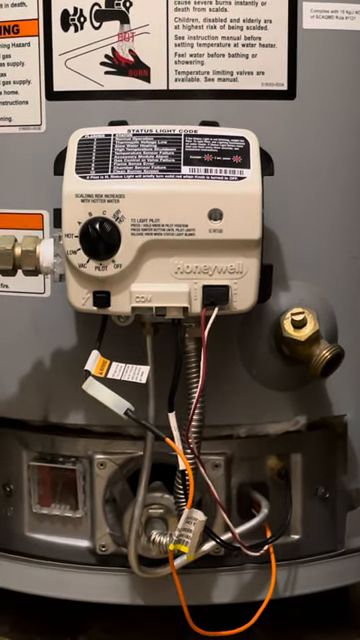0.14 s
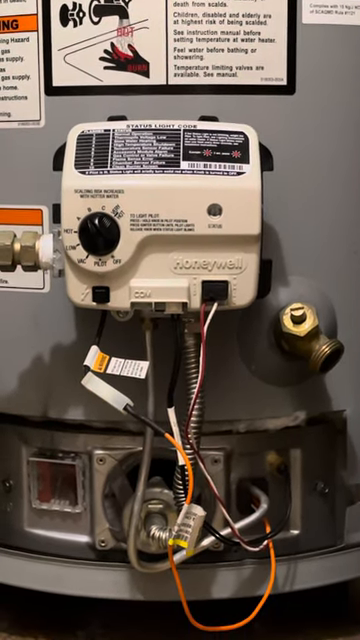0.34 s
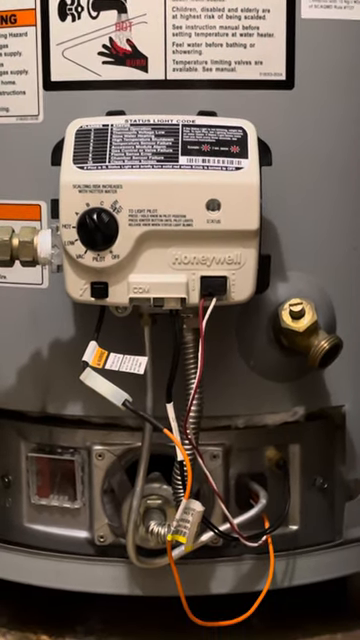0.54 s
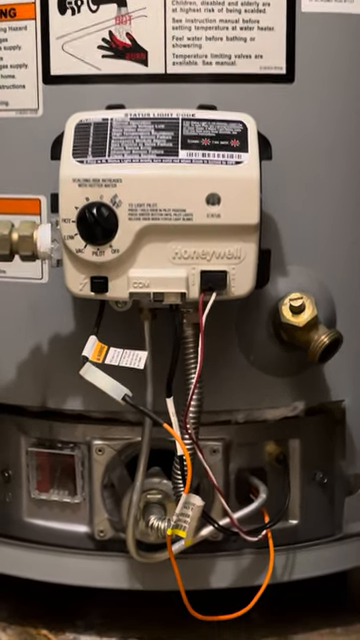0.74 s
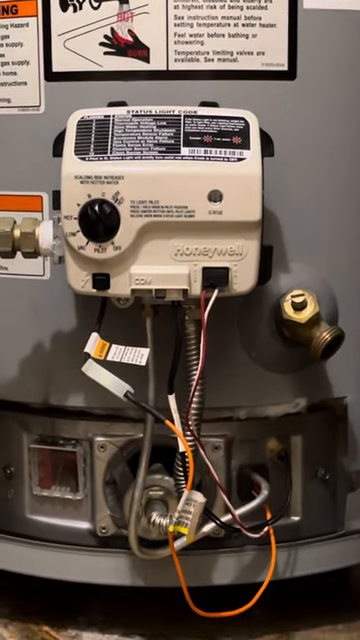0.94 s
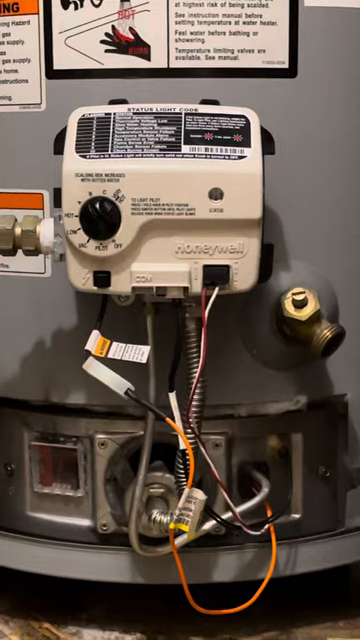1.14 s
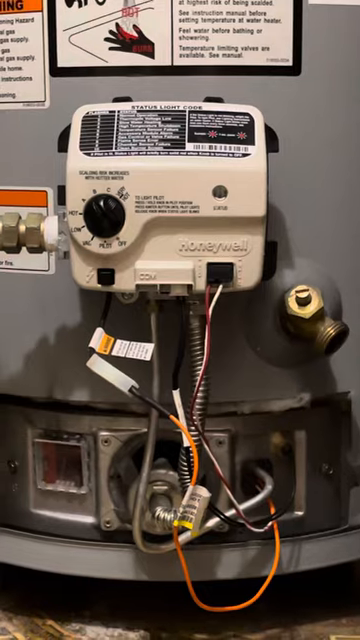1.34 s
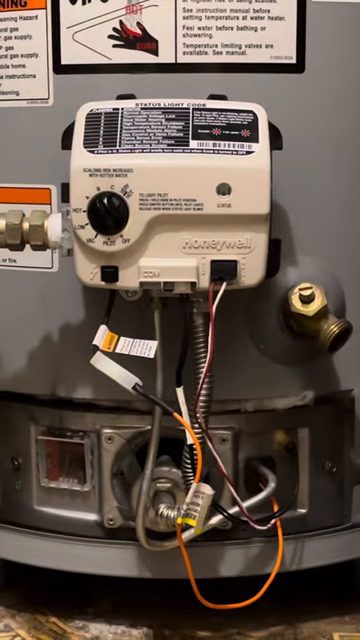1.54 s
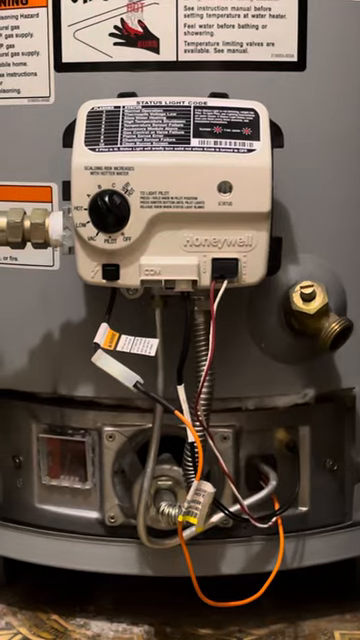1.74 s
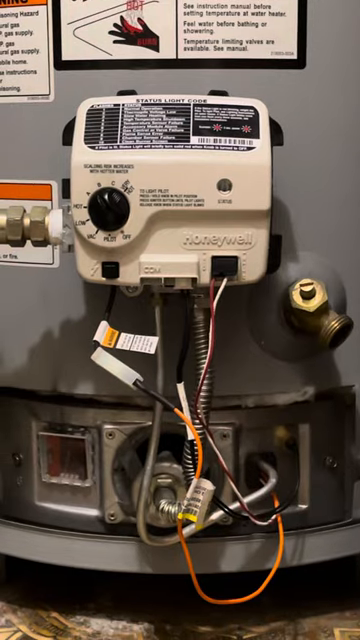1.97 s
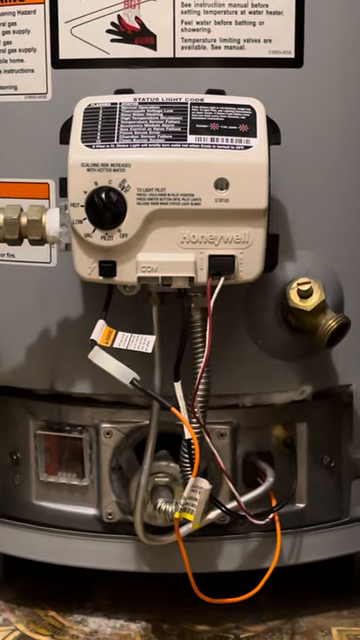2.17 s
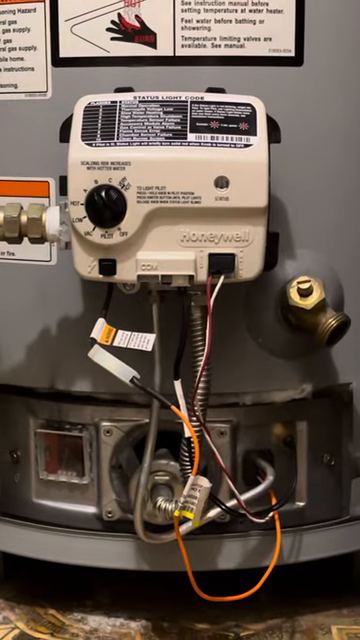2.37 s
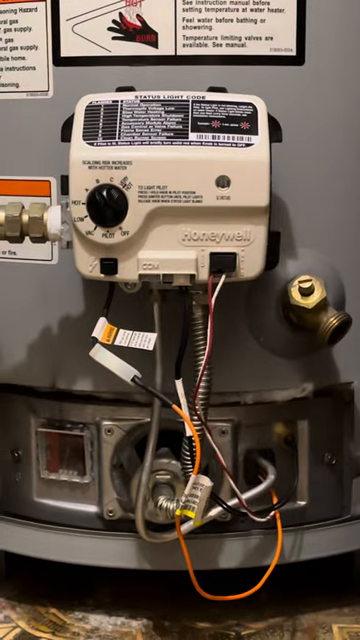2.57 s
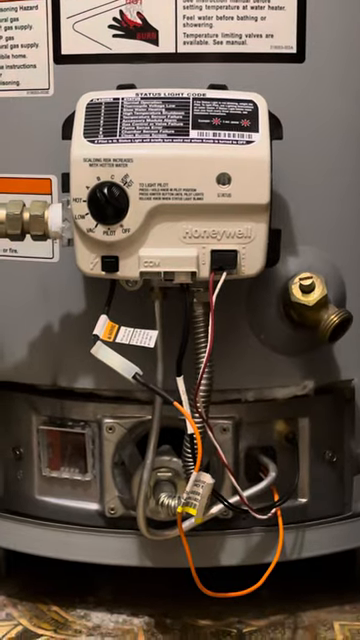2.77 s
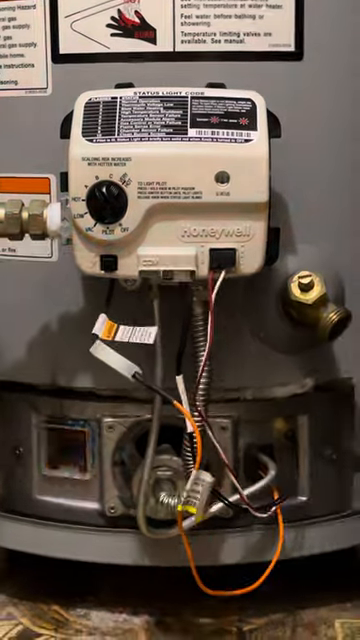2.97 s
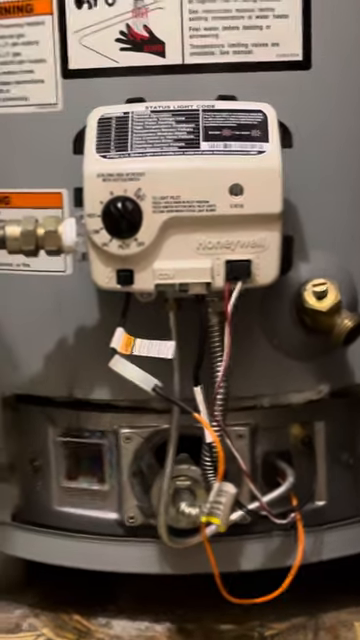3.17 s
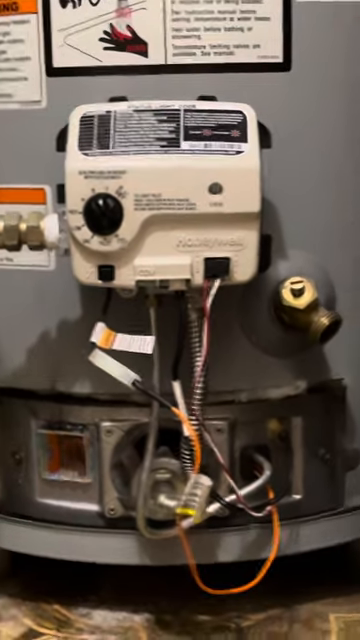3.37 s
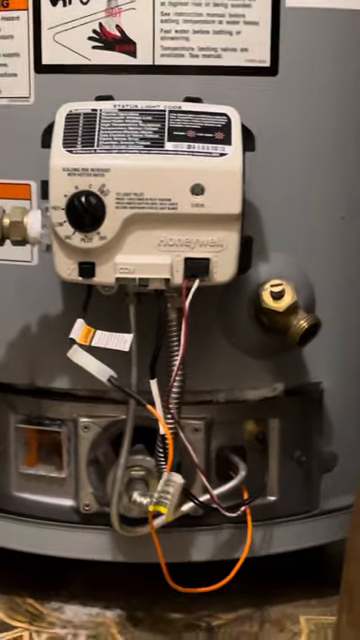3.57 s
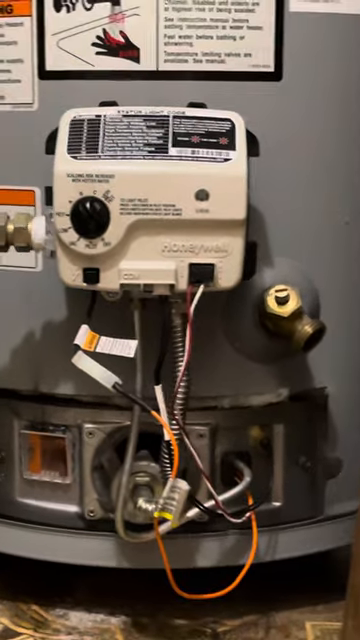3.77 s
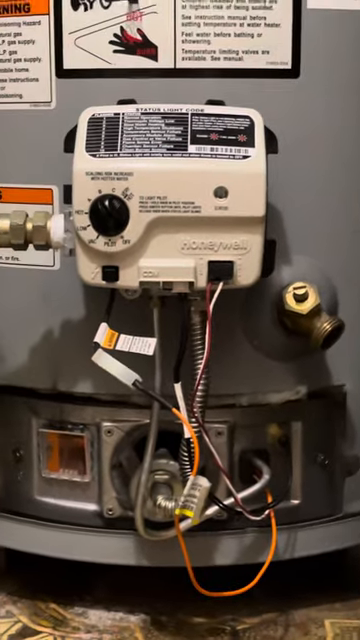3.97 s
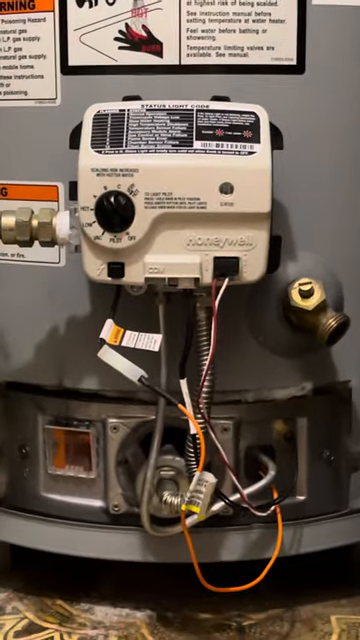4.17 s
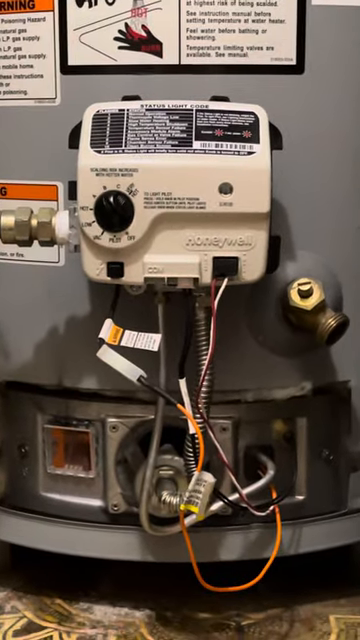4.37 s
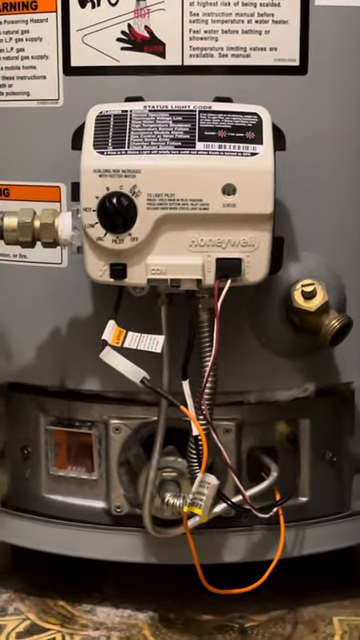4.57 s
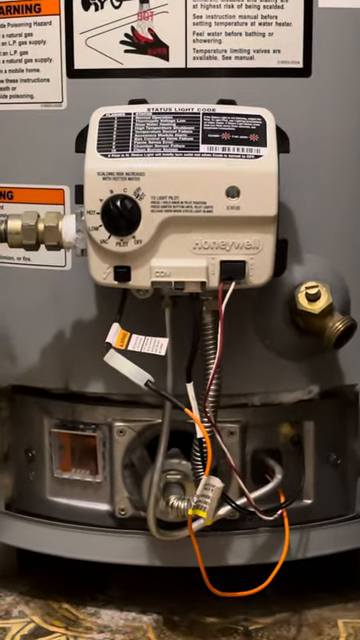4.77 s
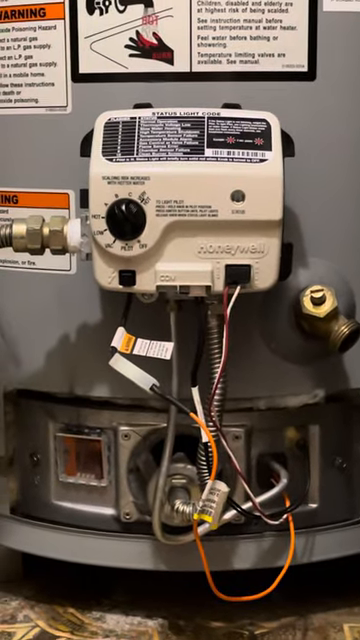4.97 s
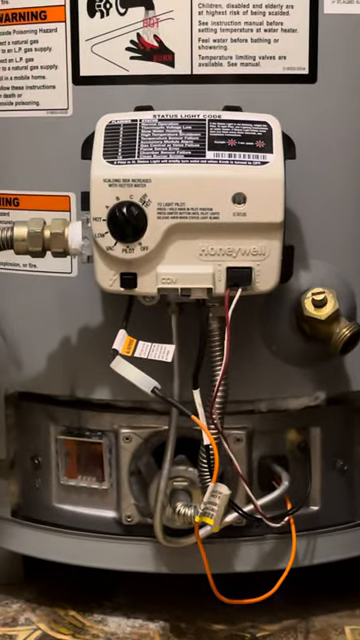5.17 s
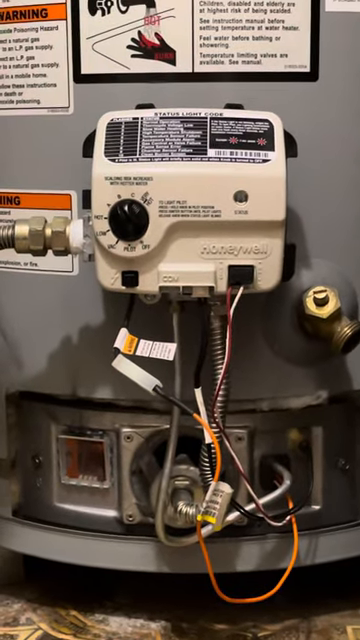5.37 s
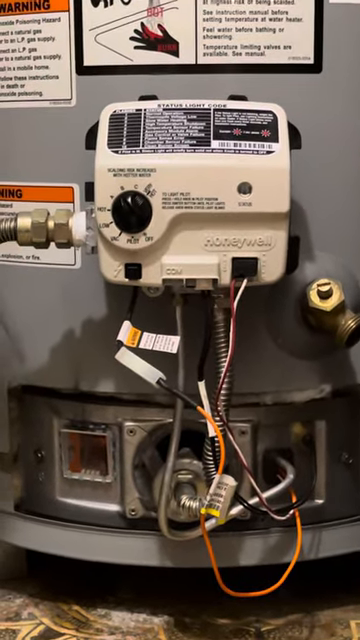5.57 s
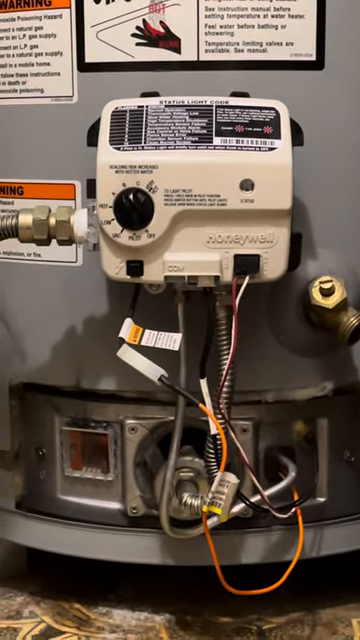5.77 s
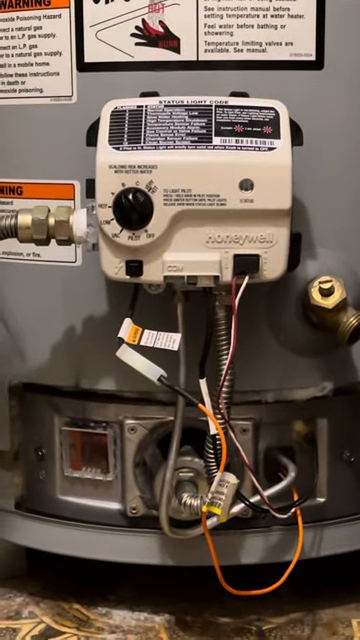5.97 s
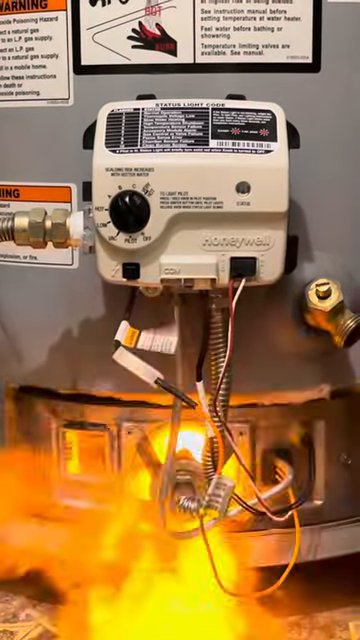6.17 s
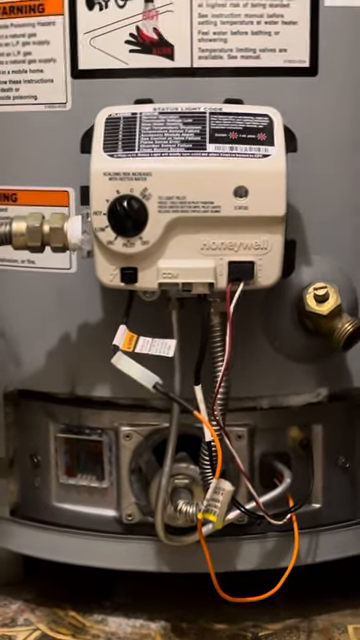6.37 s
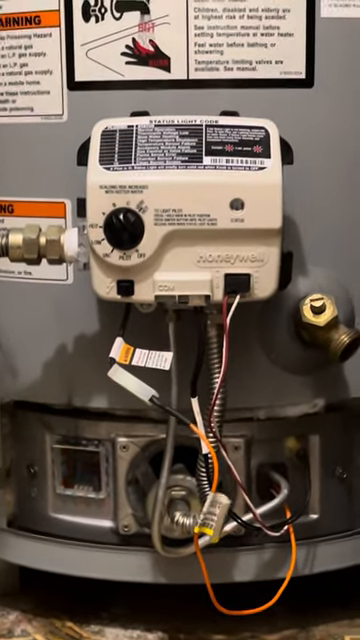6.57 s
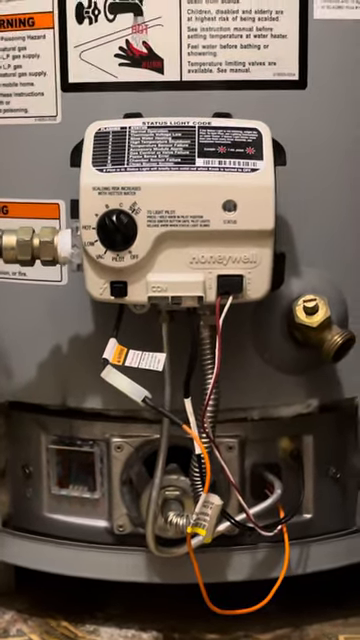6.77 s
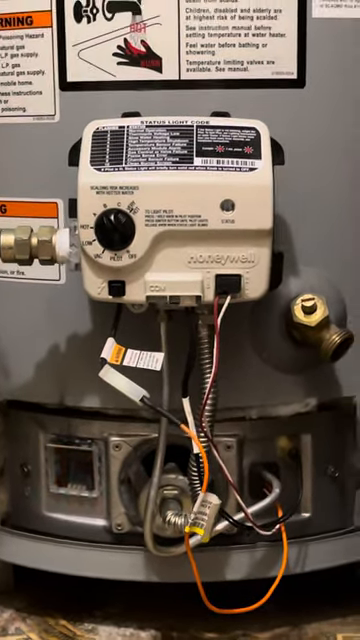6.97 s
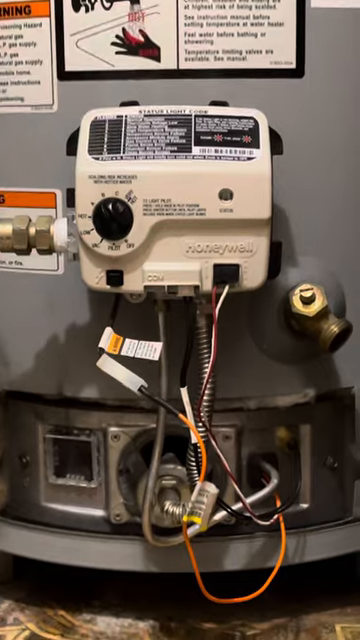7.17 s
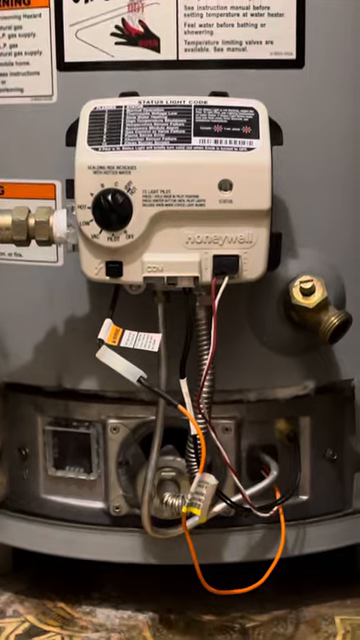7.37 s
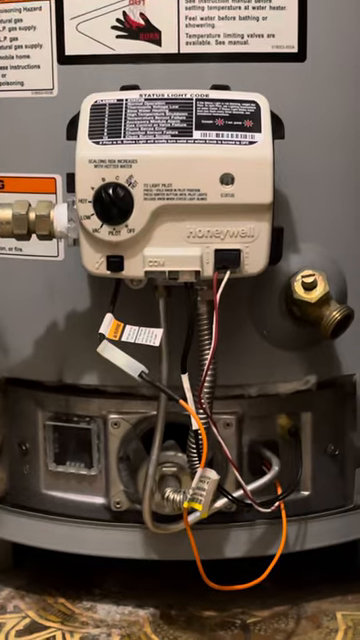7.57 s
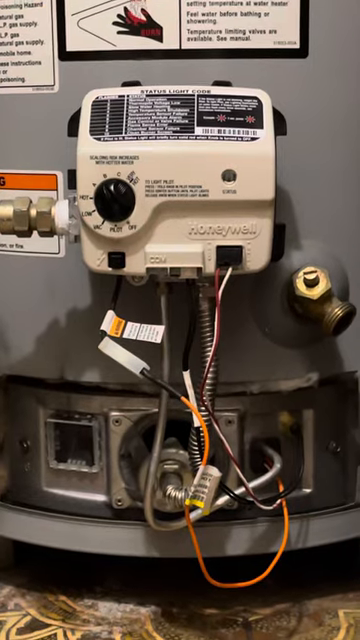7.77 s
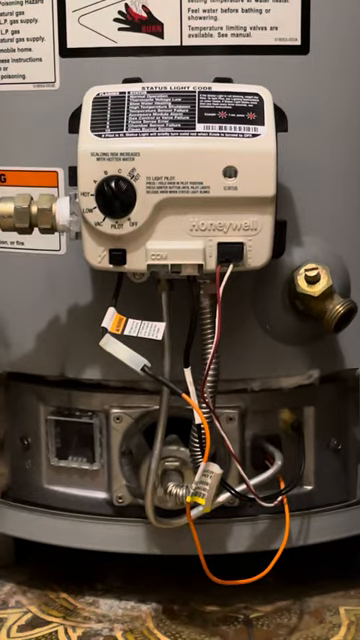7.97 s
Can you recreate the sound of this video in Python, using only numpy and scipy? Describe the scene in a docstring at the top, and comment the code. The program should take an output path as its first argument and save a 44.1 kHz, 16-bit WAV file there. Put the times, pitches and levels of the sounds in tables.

```python
"""A gas water heater burns close by: shaped noise gives its low rumble, draught and hissing gas jet.
Near 2.8 s and again near 6.1 s a flare swells, a small catch of gas sounds and the flame backfires:
a swept chamber tone booms, a noise burst and damped modes crack the metal door, and the casing rings.
Gain control ducks everything for a moment, a limiter rounds the bangs, and the gas relights in soft
puffs over a fading roar. Near the end the flame dies away and warm metal knocks faintly."""
import sys
import numpy as np
from scipy import signal
from scipy.fft import rfft, irfft
from scipy.io import wavfile
from scipy.ndimage import uniform_filter1d, minimum_filter1d

SR = 44100
rng = np.random.default_rng(int(sys.argv[2]) if len(sys.argv) > 2 else 0)


def store_pcm(level_fs):
    """Save levels as 16-bit WAV."""
    pcm = np.round(np.clip(level_fs, -1, 1) * 32767).astype(np.int16)
    wavfile.write(sys.argv[1], SR, np.atleast_2d(pcm).T)


N = 353682
TIME, BINS = np.arange(N) / SR, np.fft.rfftfreq(N, 1 / SR)  # s, Hz


def gain_of(db):
    """Level to amplitude ratio: 20 dB is a factor of ten."""
    return 10 ** (np.asarray(db) / 20)


def evened(x):
    """Normalization to an rms of 1."""
    return x / np.sqrt(np.mean(x ** 2) + 1e-20)


def read(points, hz):
    """Linear interpolation of a table over log frequency."""
    f, value = np.transpose(points)
    return np.interp(np.log(hz + 1), np.log(f + 1), value)


def colour(spectrum, modes=()):
    """Resonance: peaks of Lorentzian shape, in dB, stand on a broad spectrum; gives the gain per bin."""
    peaks_db = 0
    for hz, width_hz, db in modes:
        peaks_db = peaks_db + db / (1 + (2 * (BINS - hz) / width_hz) ** 2)
    return gain_of(read(spectrum, BINS) + peaks_db)


# likeness of the noise at the two microphone ports: [f/Hz, correlation]
LIKENESS = [(60, .999), (130, 1), (250, 0.99), (700, 0.89), (1500, 1), (4000, 0.93), (12000, 1)]


def noise(gain):
    """Spatial coherence: coloured turbulence reaches two close ports almost alike."""
    shared, other = rfft(rng.standard_normal((2, N)))
    same = np.clip(read(LIKENESS, BINS), 0, 1)
    second = same * shared + np.sqrt(1 - same ** 2) * other
    return evened(irfft(np.array([shared, second]) * gain, N))


def waver(rate_hz, depth_db):
    """Random amplitude modulation: low-passed noise is a level in dB, depth_db its rms."""
    slow = irfft(rfft(rng.standard_normal(N)) / (1 + (BINS / rate_hz) ** 4), N)
    return gain_of(depth_db * evened(slow))


# broad spectrum of the gas jet: [f/Hz, relative level per Hz/dB]
JET_SPECTRUM = [(400, -5.5), (1000, -8), (1500, -8.5), (3300, -14), (4300, -12.5), (5000, -8), (5600, -2.5),
                (7200, -6), (8500, -8.5), (10500, -6.5), (11300, -3.5), (12100, -9.5), (13000, -14),
                (14000, -63)]
# resonances of the burner tube: [f/Hz, width/Hz, level above the spectrum/dB]
TUBE_MODES = [(649.7, 108, 17), (1213, 109, 9.5), (1375, 110, 8.5), (1618, 87, 6.5), (1944, 160, 10),
              (2208, 36, 10.5), (2510, 60, 7.5), (2694, 105, 11.5), (2960, 110, 5), (3757, 290, 8.5),
              (4070, 96, 12.5), (4305, 130, 12.5), (4622, 280, 17), (5224, 108, 13), (6210, 140, 4.5),
              (7985, 640, 9), (9890, 120, 13), (10420, 425, 10.5), (10800, 296, 9)]


def gas_jet(db=-48.0, lowest_hz=330):
    """Jet noise: gas hisses out of the orifice and through the resonances of the burner tube."""
    low_cut = BINS ** 2 / (BINS ** 2 + lowest_hz ** 2)
    return gain_of(db) * noise(colour(JET_SPECTRUM, TUBE_MODES) * low_cut)


# spectrum of the air in the flue: [f/Hz, relative level per Hz/dB]
FLUE_SPECTRUM = [(18, -26), (42, -3), (75, 3), (110, -6), (200, -23), (400, -30)]


def draught(db=-50):
    """Flow noise: air drawn up the flue keeps a deep rumble going."""
    return gain_of(db) * noise(colour(FLUE_SPECTRUM) / (1 + (BINS / 400) ** 4))


def flame_db(level_db=-43.5, dies_s=7.22, fade_db_per_s=32):
    """Exponential decay: the settled flame's level is even, then falls linearly in dB."""
    return level_db - fade_db_per_s * np.maximum(TIME - dies_s, 0)


# broad spectrum of the settled flame: [f/Hz, relative level per Hz/dB]
FLAME_SPECTRUM = [(20, -39), (40, -27.5), (65, -15), (100, 0.5), (140, -14), (200, -14.5), (280, -27.5),
                  (400, -32)]


def flame(highest_hz=420):
    """Combustion noise: the settled flame rumbles and flutters."""
    rumble = noise(colour(FLAME_SPECTRUM) / (1 + (BINS / highest_hz) ** 4))
    return gain_of(flame_db()) * rumble * waver(rate_hz=20, depth_db=0.5)


# the flame's noise as the walls return it: [f/Hz, relative level per Hz/dB]
WALL_SPECTRUM = [(30, 4), (110, 11), (220, -1.5), (330, -1), (520, -4.5), (900, -7.5), (2000, -52),
                 (6000, -39)]


def room(below_flame_db=-21, below_flare_db=-25):
    """Diffuse field: walls return the noise of flame and flares, unrelated at the two ports."""
    diffuse = evened(irfft(rfft(rng.standard_normal((2, N))) * colour(WALL_SPECTRUM), N))
    # powers add
    drive = np.hypot(gain_of(flame_db() + below_flame_db), gain_of(flare_db() + below_flare_db))
    return drive * diffuse * waver(rate_hz=10.4, depth_db=1.0)


# backfires: [t/s, boom level/dB, boom f/Hz, boom hold/s, blast level/dB, blast length/s,
#   blast treble level/dB, door level/dB, factor on door f, spare-gas burn level/dB, its fade/(dB/s)]
BACKFIRES = [(2.8483, 5.5, 81.7, 0.028, 4.5, 0.0051, -0.5, 14, 0.966, -14.5, 19.5),
             (6.1382, 7.3, 82.3, 0.02, 4, 0.0045, -2.5, 14, 1.044, -15, 21.5)]


def flare_db(rise_db_per_s=649, flash_db=-18.5, flash_fade_db_per_s=150):
    """Exponential growth and decay: a swell up to each bang, then a brief flash over a slow burn."""
    strength = 0
    for s, *_, burn_db, burn_fade_db_per_s in BACKFIRES:
        before, after = np.maximum(s - TIME, 0), np.maximum(TIME - s, 0)
        flash = gain_of(flash_db - flash_fade_db_per_s * after)
        burn = gain_of(burn_db - burn_fade_db_per_s * after)
        strength = strength + (flash + burn) * gain_of(-rise_db_per_s * before)
    return 20 * np.log10(strength + 1e-9)


# broad spectrum of the flares' rumble: [f/Hz, relative level per Hz/dB]
RUMBLE_SPECTRUM = [(20, -12), (40, -4.5), (65, -2.5), (110, -5.5), (160, -10.5), (230, -28.5), (300, -29.5),
                   (420, -50)]
# resonances of the chamber: [f/Hz, width/Hz, level above the spectrum/dB]
CHAMBER_MODES = [(83.8, 11.5, 9), (188.4, 32, 13.5)]
# broad spectrum of the flares' roar: [f/Hz, relative level per Hz/dB]
ROAR_SPECTRUM = [(120, -7.5), (230, 4), (350, -6), (600, -6.5), (900, -15.5), (1500, -19.5), (2500, -23.5),
                 (3500, -30.5), (7000, -40), (13000, -86)]


def flare(rumble_db=-2, roar_db=-37.5, full_db=-20, roar_growth=1.88):
    """Nonlinear growth: spare gas burns in uneven licks, its bright roar growing faster than its rumble."""
    strength_db = flare_db()
    licks = waver(rate_hz=22, depth_db=1.6)
    rumble = noise(colour(RUMBLE_SPECTRUM, CHAMBER_MODES) / (1 + (BINS / 450) ** 4))
    roar = noise(colour(ROAR_SPECTRUM))
    rumble_gain = gain_of(strength_db + rumble_db)
    # roar_db is the roar's level at a strength of full_db
    roar_gain = gain_of(roar_db + roar_growth * (strength_db - full_db))
    return licks * (rumble_gain * rumble + roar_gain * roar)


def puff(s, db, hz, rise_s=0.0069, decay_s=0.018):
    """Transient oscillation: a soft push rocks a resonance for a few cycles."""
    u = TIME - s
    rise = (np.minimum(u + 0.0046, 0) / rise_s) ** 2
    decay = np.maximum(u, 0) / decay_s
    return gain_of(db) * np.exp(-rise - decay) * np.cos(2 * np.pi * hz * u)


# small catch of gas ahead of every backfire: [t from the bang/s, level/dB, f/Hz]
GAS_CATCH = (-0.031, -32, 223)
# rebound of the chamber after every backfire: [t from the bang/s, level/dB, f/Hz]
CHAMBER_REBOUND = (0.081, -4.5, 85)
# pockets of gas that catch as the burner relights: [t/s, level/dB, f/Hz]
RELIGHT_PUFFS = [(3.082, -9.5, 86), (3.1724, -10, 83), (3.283, -18.5, 189), (3.299, -7.5, 97.5),
                 (3.326, 0, 82.8), (6.374, -10.5, 69.5), (6.4507, -10, 69.4)]
# faint dull knock of warm metal: [t/s, level/dB, f/Hz]
METAL_KNOCK = (7.315, -53, 344)


def soft_pushes():
    """Superposition: catches, rebounds, relighting puffs and the knock add as transient oscillations."""
    total = puff(*METAL_KNOCK)
    for s, *_ in BACKFIRES:
        for delay_s, db, hz in (GAS_CATCH, CHAMBER_REBOUND):
            total = total + puff(s + delay_s, db, hz)
    for row in RELIGHT_PUFFS:
        total = total + puff(*row)
    return total


def boom(s, db, hz, held_s, growth_s=0.0049, decay_s=0.012, rush_hz=215, rush_in_s=0.00443,
         rush_out_s=0.00562, lag_s=0.0026, lead_s=0.01, vented=0.64, vent_s=0.0059):
    """Frequency modulation: pressure swings grow, quicken as the flame front rushes by, slow and die."""
    u = TIME - s - lag_s
    rush = np.exp(-(u / np.where(u < 0, rush_in_s, rush_out_s)) ** 2)
    turns = np.cumsum(hz + rush_hz * rush) / SR
    swing = -np.cos(2 * np.pi * (turns - np.interp(0, u, turns)))
    growth = np.minimum(u + lead_s, 0) / growth_s
    decay = np.maximum(u - held_s, 0) / decay_s
    # the blast vents the chamber for a moment
    sag = 1 - vented * np.exp(-((TIME - s + 0.0022) / vent_s) ** 2)
    return gain_of(db) * np.exp(growth - decay) * sag * swing


# broad spectrum of the blast, before its treble level: [f/Hz, relative level per Hz/dB]
BLAST_SPECTRUM = [(100, 10), (280, 7), (450, 0), (800, -7), (1400, -6), (2400, -12.5), (3500, -19.5),
                  (6000, -16), (8500, -21), (10800, -12.5), (12300, -35.5), (13300, -38), (15000, -50)]


def crack(s, db, length_s, treble_db, treble_hz=2600, growth_s=0.0092, lead_db=-13, stop_s=0.00053):
    """Impulsive noise: turbulence swells, the blast bursts out around the metal door and stops short."""
    u = TIME - s
    before, after = np.minimum(u, 0), np.maximum(u - 0.001, 0)
    treble_share = BINS ** 4 / (BINS ** 4 + treble_hz ** 4)
    tone = colour(BLAST_SPECTRUM) * gain_of(treble_db * treble_share)
    burst = np.exp(-(before / length_s) ** 2) * noise(tone)
    duller = noise(tone / (1 + (BINS / 4000) ** 2))
    swell = gain_of(lead_db) * np.exp(before / growth_s) * duller
    return gain_of(db) * (burst + swell) * np.exp(-after / stop_s)


# modes of the sheet-metal door: [f/Hz before the bang's factor, relative level/dB, t60/s]
DOOR_MODES = [(389, -9, 0.035), (544, -15, 0.046), (640, -16, 0.028), (942, -8, 0.014),
              (1287, -2.5, 0.0095), (1420, -22.5, 0.013), (1850, -30, 0.0083), (2280, -15.5, 0.0074),
              (2460, -25.5, 0.012)]


def door(s, db, pitch, rise_s=0.00048, early_s=0.000793):
    """Modal decay: the blast slams the door on its frame; the gasket damps its modes at once."""
    u = np.maximum(TIME - s + early_s, 0)
    modes = 0
    for hz, mode_db, t60_s in DOOR_MODES:
        decay = np.exp(-np.log(1000) * u / t60_s)
        modes = modes + gain_of(mode_db) * decay * np.sin(2 * np.pi * hz * pitch * u)
    return gain_of(db) * modes * (1 - np.exp(-u / rise_s))


# ring of the casing and the closet: [f/Hz, t60/s]
RING_DECAY = [(100, 0.43), (500, 0.34), (1200, 0.27), (3000, 0.15), (6000, 0.25), (12000, 0.22)]


def ring(x, build_s=0.0082):
    """Reverberation: dense reflections of random sign build up, then each band dies at its own speed."""
    length = SR // 2
    taps = rng.choice([-1., 1.], length) * (rng.random(length) < 3000 / SR)  # 3000 per second
    taps *= 1 - np.exp(-TIME[:length] / build_s)
    hz, t, bands = signal.stft(taps, SR, nperseg=256)
    decay = gain_of(-60 * t / read(RING_DECAY, hz)[:, None])
    tail = signal.istft(bands * decay, SR, nperseg=256)[1]
    return signal.fftconvolve(x, tail[None] / np.linalg.norm(tail), axes=1)[:, :N]


# phase lead of the left microphone port: [f/Hz, lead/rad]
LEFT_LEAD = [(20, 0), (2000, 0), (2700, .4), (3400, .25), (4100, 1.2), (4850, 3.14), (5230, 4.8),
             (5700, 6.1), (6600, 6.6), (7700, 7.9), (9050, 9.4), (9800, 10.4), (10800, 11), (12000, 12.4)]


def scene(ring_db=-14, door_ring_db=-20):
    """Common path: all sources in the burner chamber reach the two ports with the same phase lead."""
    booms = cracks = slams = 0
    for s, boom_db, hz, held_s, blast_db, length_s, treble_db, door_db, pitch, *_ in BACKFIRES:
        booms = booms + boom(s, boom_db, hz, held_s)
        cracks = cracks + crack(s, blast_db, length_s, treble_db)
        slams = slams + door(s, door_db, pitch)
    echoes = ring(gain_of(ring_db) * cracks + gain_of(door_ring_db) * slams)
    burning = gas_jet() + draught() + flame() + flare()
    left, right = burning + soft_pushes() + booms + cracks + slams + echoes
    left = irfft(rfft(left) * np.exp(1j * read(LEFT_LEAD, BINS)), N)
    return np.array([left, right]) + room()


def excess_db(x, limit_db):
    """Peak level: how far the louder channel stands over a limit."""
    return np.maximum(20 * np.log10(abs(x).max(0) + 1e-9) - limit_db, 0)


def falling(db, db_per_s):
    """Peak hold: follows every rise of a level and falls no faster than the given slope."""
    return np.maximum.accumulate(db + db_per_s * TIME) - db_per_s * TIME


def duck(x, threshold_db=-4, attack_s=0.04, hold_s=0.072, release_db_per_s=130,
         slow_share=0.14, slow_db_per_s=1.26):
    """Gain control: sinks after an overload, holds, lets go quickly, gives back the last few dB slowly."""
    hold = int(hold_s * SR)
    held_db = -minimum_filter1d(-excess_db(x, threshold_db), hold, origin=(hold - 1) // 2)
    quick_db = falling(held_db, release_db_per_s)
    slow_db = falling(slow_share * held_db, slow_db_per_s)
    keep = np.exp(-1 / (attack_s * SR))
    return x / gain_of(signal.lfilter([1 - keep], [1, -keep], np.maximum(quick_db, slow_db)))


def limit(x, ceiling_db=-0.7, window_s=0.0011):
    """Look-ahead limiting: swings over the ceiling are rounded off just under full scale."""
    window = int(window_s * SR) | 1  # odd, so centred
    peak_db = -minimum_filter1d(-excess_db(x, ceiling_db), window)
    return x / gain_of(uniform_filter1d(peak_db, window))


def record(dry, edge_hz=15100):
    """Dynamic compression and band limiting: gain control, the limiter, then a low-pass."""
    low_pass = signal.firwin(511, edge_hz, window=("kaiser", 9), fs=SR)
    return signal.oaconvolve(limit(duck(dry)), low_pass[None], "same")


dry = scene()
out = record(dry)
store_pcm(out)
```